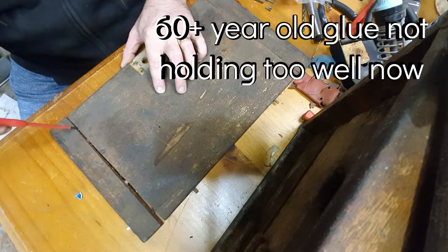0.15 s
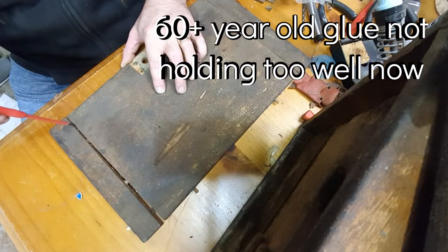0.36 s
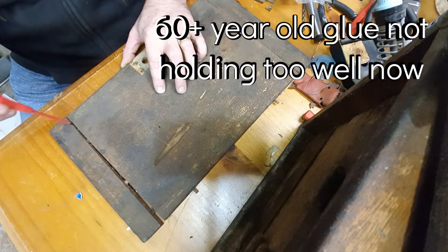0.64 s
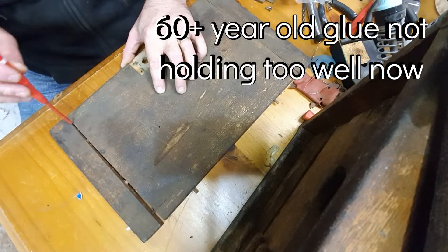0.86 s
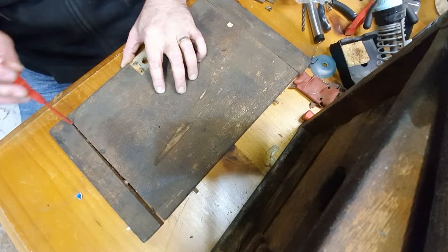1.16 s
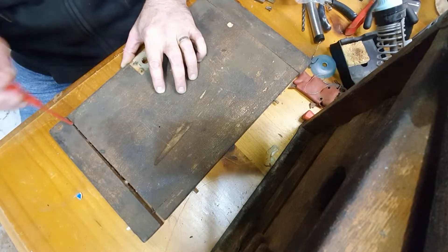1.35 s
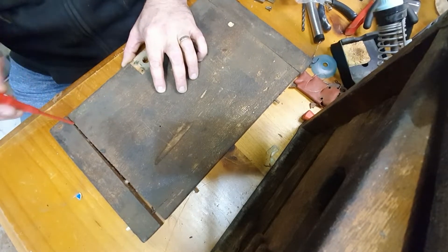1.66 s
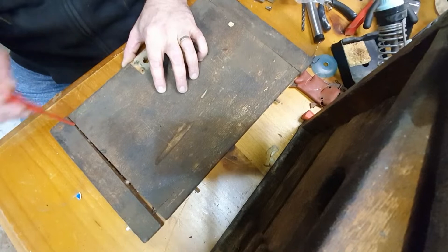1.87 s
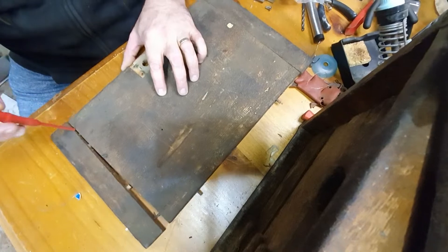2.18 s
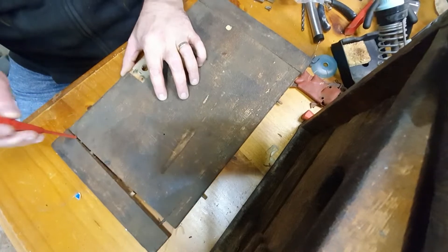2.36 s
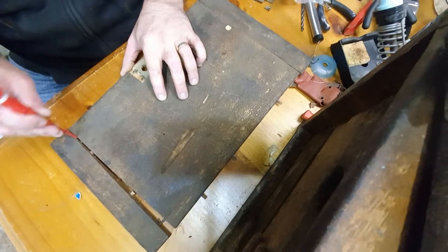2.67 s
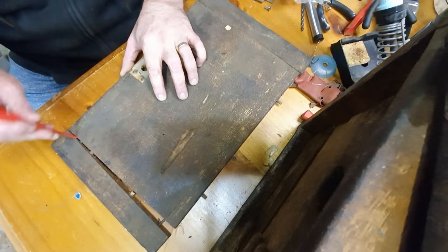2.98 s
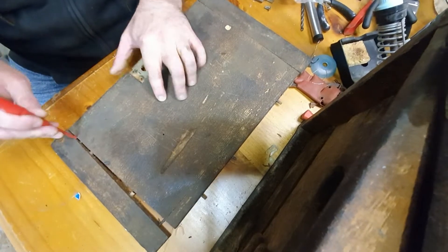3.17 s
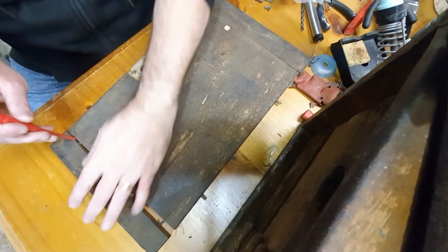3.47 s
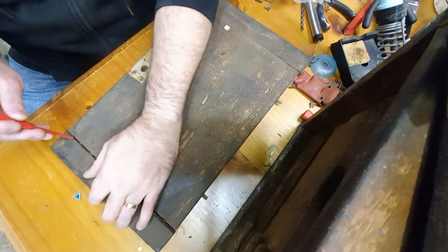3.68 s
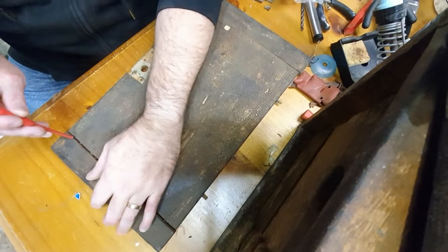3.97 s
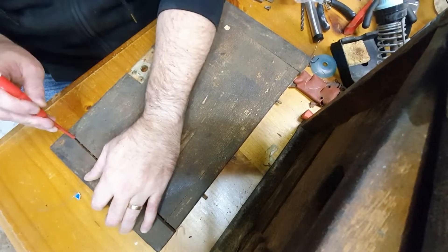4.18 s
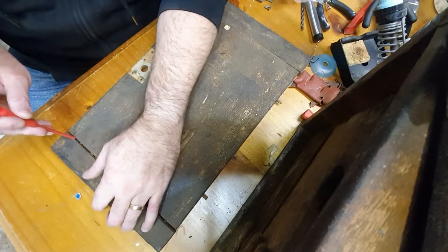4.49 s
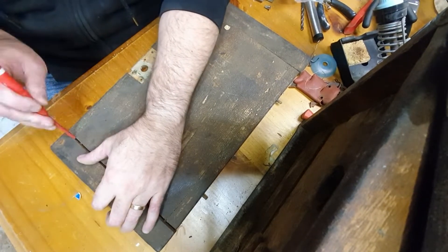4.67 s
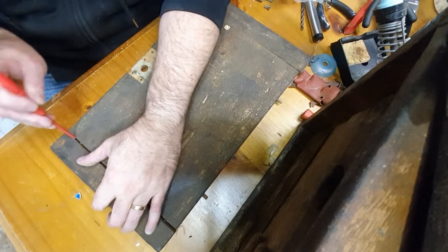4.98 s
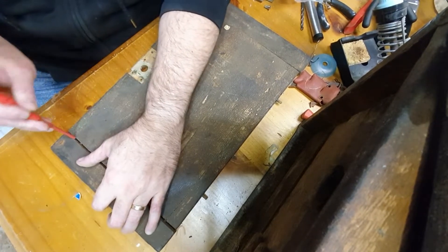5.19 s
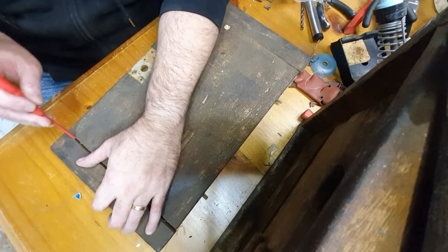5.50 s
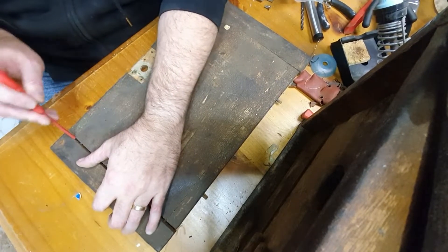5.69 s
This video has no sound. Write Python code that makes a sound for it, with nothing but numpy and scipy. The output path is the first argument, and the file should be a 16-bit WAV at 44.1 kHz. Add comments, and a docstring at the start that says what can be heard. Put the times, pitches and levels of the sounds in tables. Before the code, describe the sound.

Old glue cracks four times as a screwdriver pries at a wooden panel, amid light taps, ticks and scrapes.

```python
"""Dry glue cracks four times, loudly, as a screwdriver prises at the edge strip of an old wooden panel.
The panel lies on a workbench, close to a stereo microphone pair, and each crack sets it ringing.
The blade ticks and scrapes in the joint; after the cracks a hand moves over and the loose strip is
probed with light taps. A small workshop answers from behind, over a low rumble."""
import sys
import numpy as np
from scipy import signal
from scipy.fft import rfft, irfft
from scipy.io import wavfile
from scipy.ndimage import uniform_filter1d

SR = 44100
rng = np.random.default_rng(int(sys.argv[2]) if len(sys.argv) > 2 else 0)


def unload_wav(signal):
    """Save mono or channel-first audio to the path in sys.argv[1] as 16-bit WAV at rate SR, clipped to [-1, 1]."""
    wavfile.write(
        sys.argv[1],
        SR,
        np.round(np.clip(np.atleast_2d(signal).T, -1, 1) * 32767).astype(np.int16),
    )


N = 257544

# the workshop's room tone: (frequency [Hz], relative spectral level [dB])
ROOM_TONE = [(20, -32.5), (33, -16), (45, -8), (75, -0.5), (130, -6.5), (200, -22.5), (370, -17),
             (600, -23.5), (1000, -31), (1900, -35), (2400, -46.5), (3400, -44), (4300, -59.5),
             (5000, -50.5), (8000, -56.5), (16000, -61.5)]
# the workshop's echo: (frequency [Hz], relative band level [dB], t60 [s])
ROOM_ECHO = [(98.3, -8.5, 0.94), (291.8, -7.5, 0.15), (460, -5, 0.56), (731, -7, 0.42), (1500, -7.5, 0.54),
             (4000, -10, 0.43), (8260, -8.5, 0.32), (16000, -11, 0.27)]
# the image at the microphone pair: (frequency [Hz], side against mid [dB], left minus right [dB])
MIC_IMAGE = [(59.4, -14, 0.5), (149, -15, 1.5), (338, -10, 1.5), (650, -4.5, 1.5), (1050, 0, 2),
             (2400, 3, 4.5), (4200, -2, 3), (6760, 2.5, 5), (13900, -2, 3)]
# the panel's own modes: (frequency [Hz], level [dB], t60 [s])
PANEL_MODES = [(119.3, -4, 0.2), (150.3, -8.5, 0.24), (182.4, -3.5, 0.15), (214.4, -4.5, 0.11),
               (347.8, 1.5, 0.1), (498, -7.5, 0.22), (578, -5, 0.3), (679, -6, 0.33), (753.3, -9.5, 0.24),
               (932, -11.5, 0.24), (1035, -11.5, 0.22), (1231, -3, 0.097), (3348, -4, 0.03),
               (4178, -2.5, 0.022)]
# the dense, quickly damped ringing of the grain: (frequency [Hz], level [dB], t60 [s])
GRAIN_RING = [(98, -10.5, 0.12), (194, -3.5, 0.04), (330, 2, 0.042), (464, -2, 0.055), (810, 2, 0.058),
              (1330, -3.5, 0.043), (2100, -13.5, 0.11), (3490, -11.5, 0.033), (4440, -20, 0.041),
              (4700, -21.5, 0.042), (6580, -18.5, 0.02), (11070, -32.5, 0.039), (15650, -29.5, 0.015)]
# the loose strip's modes, hollow and short: (frequency [Hz], level [dB], t60 [s])
STRIP_MODES = [(369, 0.5, 0.046), (597, -5, 0.04), (761.5, -4, 0.046), (1067, -12, 0.037),
               (1490, -5.5, 0.026), (2340, -10, 0.0074)]
# the steel blade's modes: (frequency [Hz], level [dB], t60 [s])
BLADE_MODES = [(1586, -2.5, .04), (2577, -6, .025), (3325, 1, .025), (4280, 0.5, 0.015)]
# a harder contact reaches higher: (hardness [0-1], clack level [dB], snap level [dB]), both relative
CONTACT = [(0, -22.5, -38), (0.301, -8.5, -23.5), (0.552, -6.5, -22.5), (1, -3.5, -2)]
# the panel shifting under the hand: (time [s], level [dB])
SHIFT_LEVELS = [(0, -53.5), (.9, -48.5), (1.05, -58), (1.33, -54), (1.39, -40), (2.1, -45), (2.22, -48),
                (3.302, -47), (3.37, -45), (3.458, -54), (5.84, -51)]
# blade or hand sliding on the wood; skin hisses more than steel:
# (middle time [s], length [s], level [dB], relative hiss level [dB])
SCRAPES = [(0.494, 0.1, -58, -21), (0.74, 0.08, -52.5, -21), (1.172, 0.019, -49.5, -19),
           (1.452, 0.1, -54, -14), (1.775, 0.31, -57, -20), (1.925, 0.11, -52, -12),
           (2.336, 0.074, -44, -23), (2.488, 0.1, -67, -6.5), (3.207, 0.024, -51, -14),
           (3.268, 0.041, -50, -11.5), (3.375, 0.054, -51, -22), (3.631, 0.033, -48.5, -14),
           (3.72, 0.099, -50, -19.5), (4.096, 0.035, -53, -21.5), (4.641, 0.075, -57.5, -9)]
# the blade tip catching on splinters and glue: (time [s], level [dB], brightness [dB])
TICKS = [(0.297, -62.5, -7), (0.475, -54, -5), (0.521, -68, 9), (0.705, -62, 9.5), (.848, -57, -4),
         (1.174, -60, -1), (1.233, -54, -5), (1.493, -49, -16), (1.907, -39.5, -5.5), (1.968, -38, -30),
         (2.517, -60.5, -6.5), (2.669, -46.5, -15), (2.702, -55, -22), (2.905, -40.5, -17.5),
         (2.913, -52.5, -18), (3.059, -48, -31), (3.111, -51, -16), (3.203, -52.5, -10), (3.255, -66, -18),
         (3.371, -57, -25), (3.63, -49, -8), (4.446, -44, -15), (4.472, -51.5, -8.5), (4.685, -48, -13.5),
         (5.057, -46, -8.5), (5.068, -53, -16), (5.456, -49.5, -11), (5.668, -58.5, -24.5),
         (5.773, -45, -9.5)]
# blade and hand knocking: (time [s], level [dB], pitch [Hz], hardness [0-1], loose strip's share [0-1])
KNOCKS = [(0.183, -32.5, 380, 0.32, 0.59), (.345, -42.5, 243, 0.31, 0.67), (0.69, -42, 150, 0.18, 0.12),
          (1.136, -32.5, 264, 0, 0.5), (1.169, -34, 316, 0.52, 0.74), (1.359, -29, 265, 0.17, 0.25),
          (1.378, -33.5, 158, 0.45, 0.2), (1.462, -30, 215, 0.21, 0.25), (1.628, -31.5, 211, 0.13, 0.01),
          (1.769, -27, 195, 0.18, 0.04), (1.792, -26, 205, 0.15, 0.05), (1.945, -29, 206.4, 0, 0.27),
          (1.974, -34.5, 241.5, 0.8, .1), (1.982, -28.5, 210, .75, 0.1), (2.67, -41.5, 130, 0.3, 0),
          (2.776, -27.5, 191, 0.76, 0.2), (2.906, -35, 168, 0.2, 0), (3.057, -39, 205, 0.68, 0.09),
          (3.169, -41, 208, 0.06, 0.03), (3.332, -34.5, 134, 0.16, 0.02), (3.36, -41.5, 136, 0.6, 0),
          (3.394, -39, 140, 0, 0), (3.629, -38.5, 199, 0.87, 0.44), (3.713, -34.5, 270, 0.68, 0.76),
          (3.72, -36, 298, 0.87, 0.6), (3.733, -35.5, 210, 0.13, 0.2), (4.105, -39.5, 180, 0.68, 0.18),
          (4.436, -42.5, 219, 0.3, 0.2), (4.443, -32, 260, 0.84, 0.99), (4.677, -39, 186, 0.19, 0.04),
          (4.887, -39, 190, 0.11, 0.37), (5.069, -36, 207, 0.23, 0.2), (5.27, -39.5, 181, 0.2, 0.43),
          (5.45, -35, 193, 0.43, 0.4), (5.613, -41, 218, 0, 0.3), (5.767, -39.5, 166, 0.37, 0.16)]
# the glue letting go:
# (time [s], level [dB], pitch [Hz], hardness [0-1], second split's delay [s], its relative level [dB])
CRACKS = [(1.548, -23, 300, 0.62, 0.011, -3), (1.709, -21.5, 323, 0.67, 0.0084, -1.5),
          (1.874, -16.5, 288, 0.8, .0105, -4), (2.0475, -19.5, 280, 0.83, 0.015, -2.5)]

RING_S, TICK_S = .3, .06  # how long a blow and a tick are left to ring


def undb(db):
    """Decibels to gain."""
    return 10 ** (np.asarray(db) / 20)


def at(hz, table, axis=1):
    """A column of a table, read on a log-frequency axis."""
    table = np.array(table, float)
    return np.interp(np.log(np.maximum(hz, 1)), np.log(table[:, 0]), table[:, axis])


def band(x, lo_hz, hi_hz, order=3):
    """Causal band-pass."""
    sos = signal.butter(order, [lo_hz, min(hi_hz, SR / 2 - 100)], "band", fs=SR, output="sos")
    return signal.sosfilt(sos, x)


def resonance(x, hz, width_hz):
    """One resonance, gain 1 at its centre."""
    return signal.lfilter(*signal.iirpeak(hz, hz / width_hz, fs=SR), x)


def unit(x):
    """Scale to rms 1."""
    return x / np.sqrt(np.mean(x ** 2))


def burst(x, db):
    """Scale a hit so that its energy equals db held for 20 ms."""
    return x * undb(db) * np.sqrt(2 * .02 * SR / np.sum(x ** 2))


def onset(x, rise_s):
    """Let a hit build up over rise_s."""
    return x * (1 - np.exp(-(np.arange(x.shape[1]) / (rise_s * SR)) ** 2))


def add(out, s, x):
    """Mix x in from time s."""
    i = max(int(s * SR), 0)
    out[:, i:i + x.shape[1]] += x[:, :max(N - i, 0)]


def leftward(x, db):
    """Place a sound toward the left microphone."""
    return x * undb(np.array([[db], [-db]]) / 2)


def mic_pair(x):
    """Two unrelated signals at the microphones: alike in the bass, wide and leftward in the treble."""
    size = x.shape[1]
    hz = np.fft.rfftfreq(size, 1 / SR)
    mid, side = rfft(x)
    share, sign = undb(at(hz, MIC_IMAGE)), np.array([[1], [-1]])
    spread = (mid + sign * share * side) / np.hypot(1, share)
    return irfft(spread * undb(sign * at(hz, MIC_IMAGE, axis=2) / 2), size)


def stereo_noise(size):
    """White noise as the microphone pair hears it."""
    return mic_pair(rng.standard_normal((2, size)))


def tail(table, length_s, even=False):
    """Countless close modes: noise bands dying at their own rates; even gives each fade equal energy."""
    t = np.arange(int(length_s * SR)) / SR
    hz = np.fft.rfftfreq(len(t), 1 / SR)
    spectrum = rfft(stereo_noise(len(t))) * undb(at(hz, table))
    centres = np.geomspace(60, 16000, 17)  # half an octave apart
    out = 0
    for centre, pick in zip(centres, np.eye(len(centres))):
        noise = irfft(spectrum * np.interp(hz, centres, pick), len(t))
        fade = np.exp(-np.log(1000) * t / at(centre, table, axis=2))
        out = out + noise * fade / (np.linalg.norm(fade) if even else 1)
    return out


def ring_modes(table, scatter_db, detune, length_s):
    """Decaying modes, reweighted and detuned at random as the struck spot and hand pressure vary."""
    t = np.arange(int(length_s * SR)) / SR
    hz, db, t60 = np.array(table, float).T[:, :, None]
    weight, shift, polarity, lag = rng.standard_normal((len(table), 4)).T[:, :, None]
    swing = np.sign(polarity) * undb(db + scatter_db * weight) * np.exp(-np.log(1000) * t / t60)
    phase = 2 * np.pi * hz * (1 + detune * shift) * t
    # short waves reach the two microphones out of step
    apart = lag * undb(at(hz, MIC_IMAGE)) * 0.5
    lean_db = at(hz, MIC_IMAGE, axis=2) / 2
    mics = [swing * undb(side * lean_db) * np.sin(phase + side * apart) for side in (1, -1)]
    return np.sum(mics, axis=1)


def room_tone(level_db=-49.5):
    """Steady rumble and faint hiss of the workshop."""
    spectrum = rfft(stereo_noise(N)) * undb(at(np.fft.rfftfreq(N, 1 / SR), ROOM_TONE))
    return unit(irfft(spectrum, N)) * undb(level_db)


def room_echo(direct):
    """Sound leaves the panel to either side, and each side finds its own way round the room."""
    return sum(signal.oaconvolve(side[None], tail(ROOM_ECHO, 1.0, even=True), axes=1)[:, :N]
               for side in direct)


def shifting(trim_db=-1):
    """The panel rocks and rubs on the bench under the hand: a dull, uneven mutter."""
    s, db = np.transpose(SHIFT_LEVELS)
    mutter = unit(band(stereo_noise(N), 69, 215, order=2))
    return mutter * undb(np.interp(np.arange(N) / SR, s, db) + trim_db)


def panel_ring(modes_db):
    """The struck panel: its own modes over the dense ringing of the grain."""
    modes = ring_modes(PANEL_MODES, scatter_db=2, detune=.022, length_s=RING_S)
    return undb(modes_db) * modes + tail(GRAIN_RING, RING_S)


def sing(x, db):
    """Steel on this wood makes it sing in one treble band."""
    return x + undb(db) * resonance(x, hz=4330, width_hz=330)


def scrapes(slips_per_s=170, spread_db=7, rasp_db=-2, spots=4, rest_from_s=3.9, rest_db=-67.5):
    """Dense, uneven stick-slips ring the wood at several spots; its rough face hisses above them."""
    t = np.arange(N) / SR
    slipping = rng.random((spots, N)) < slips_per_s / SR
    slips = slipping * undb(spread_db * np.minimum(rng.standard_normal((spots, N)), 1))
    wood = sum(signal.oaconvolve(spot[None], onset(panel_ring(modes_db=-44.5), .0048), axes=1)[:, :N]
               for spot in slips)
    rub = unit(band(wood, 600, 8000, order=1))
    slip_power = uniform_filter1d(np.sum(slips ** 2, axis=0), 60)
    grit = np.sqrt(np.abs(slip_power) + .003)
    hiss = unit(band(stereo_noise(N) * grit, 4100, 12000, order=2))
    out = 0
    for s, length_s, db, hiss_db in SCRAPES:
        # the harder the blade presses, the more the wood sings
        rasp = unit(sing(rub, np.interp(db, [-55, -47], [3, 14])))
        stroke = np.exp(-2 * ((t - s) / length_s) ** 2)
        out = out + stroke * (rasp * undb(db + rasp_db) + hiss * undb(db + hiss_db))
    # once the hand lies across the strip it keeps rubbing faintly
    resting = rub * undb(rest_db) * (t > rest_from_s)
    return leftward(out + resting, db=4)


def tick(db, bright_db, slip_s=.0005):
    """One slip of the steel tip: the blade rings over a short woody click and a dry, bright scratch."""
    steel = ring_modes(BLADE_MODES, scatter_db=4, detune=.035, length_s=TICK_S)
    t = np.arange(steel.shape[1]) / SR
    click = band(tail(GRAIN_RING, TICK_S), 2000, 7400, order=2)
    body = onset(burst(steel, db - 9) + burst(click, db - 5), rise_s=.00088)
    scratch = leftward(stereo_noise(len(t)) * t * np.exp(-t / slip_s), db=10)
    scratch = band(scratch, 3800, 21000, order=2)
    return leftward(body, db=5) + burst(scratch, db + bright_db - 1)


def ticks(crumb_db=-15, mean_gap_s=.005, crumbs=3):
    """The steel tip slips off a splinter, and a few crumbs of glue follow."""
    out = np.zeros((2, N))
    for s, db, bright_db in TICKS:
        add(out, s, tick(db, bright_db))
        delays = np.cumsum(rng.exponential(mean_gap_s, crumbs))
        for delay, size in zip(delays, rng.standard_normal(crumbs)):
            add(out, s + delay, tick(db + crumb_db, bright_db) * size)
    return out


def strip_ring(hardness, soft_hz=560, opens_hz=5500):
    """The loose strip's hollow note; a harder contact reaches its higher modes."""
    ring = ring_modes(STRIP_MODES, scatter_db=1.2, detune=.012, length_s=RING_S)
    return band(ring, 150, soft_hz + opens_hz * hardness ** 2, order=2)


def blow(db, hz, hardness, strip_share, thump_db=1.5):
    """Soft pushes mostly thump; hard contacts and breaking glue also clack and snap."""
    grades, clacks, snaps = np.transpose(CONTACT)
    clack_db = db + np.interp(hardness, grades, clacks)
    snap_db = db + np.interp(hardness, grades, snaps)
    # force 0: a light tap settles in, drier, at the left edge; 1: glue breaks at once and rings the panel
    force = np.interp(snap_db, [-48, -30], [0, 1])
    modes_db = np.interp(force, [0, 1], [-28, -22])
    rise_s = np.interp(force, [0, 1], [.0016, .000043])
    snap_top_hz = np.interp(force, [0, 1], [13000, 5100])
    left_db = np.interp(force, [0, 1], [5.5, -3])
    ring = onset(panel_ring(modes_db), rise_s)
    strip = burst(onset(strip_ring(hardness), rise_s), db - 1.5)
    # the speed of the push picks which low modes answer
    low_ring = burst(band(ring, hz / 2.29, hz * 1.242, order=2), db)
    # part of a break's thump is one dry shove that does not ring on
    impulse = np.ones((2, 1)) * signal.unit_impulse(ring.shape[1])
    shove = burst(band(impulse, hz / 2, hz * 2, order=2), db)
    shove_share = .45 * force
    thump = np.sqrt(shove_share) * shove + np.sqrt(1 - shove_share) * low_ring
    # a padded contact with little snap also has a duller clack
    clack_top_hz = np.interp(snap_db - clack_db, [-20, -8], [1200, 2300])
    clack = band(ring, 561, clack_top_hz)
    snap = leftward(sing(band(ring, 3100, snap_top_hz, order=2), db=-2), left_db)
    panel = thump * undb(thump_db) + burst(clack, clack_db + .5) + burst(snap, snap_db + 1)
    return np.sqrt(1 - strip_share) * panel + np.sqrt(strip_share) * strip


def knocks():
    """Single blows of blade and hand on the panel and its loose strip."""
    out = np.zeros((2, N))
    for s, db, hz, hardness, strip_share in KNOCKS:
        add(out, s, blow(db, hz, hardness, strip_share))
    return out


def fibres(db, hardness, mean_delay_s=.003, spread_db=5, count=14):
    """Wood fibres tear one after another: a quick, thinning rattle of tiny clicks under the snap."""
    clicks = np.zeros((2, int(RING_S * SR)))
    when = np.minimum(rng.exponential(mean_delay_s, count) * SR, clicks.shape[1] - 1).astype(int)
    clicks[:, when] = rng.choice([-1, 1], count) * undb(spread_db * rng.standard_normal((2, count)))
    grades, _, snaps = np.transpose(CONTACT)
    snap_db = db + np.interp(hardness, grades, snaps)
    return burst(band(clicks, 2600, 6200, order=4), snap_db - 8)


def cracks(strip_share=.14):
    """The glue joint breaks with a thump and tearing fibres, then splits further with less weight."""
    out = np.zeros((2, N))
    for s, db, hz, hardness, split_s, split_db in CRACKS:
        add(out, s, blow(db, hz, hardness, strip_share) + fibres(db, hardness))
        split = blow(db + split_db, hz, hardness, strip_share, thump_db=-4.5)
        add(out, s + split_s, split + fibres(db + split_db, hardness))
    return out


def scene():
    """The work on the panel up close, its echo from bench and walls 8 ms later, and room tone behind."""
    out = cracks() + knocks() + ticks() + scrapes()
    add(out, .008, room_echo(out) * undb(-3))
    return out + shifting() + room_tone()


def record(dry):
    """The microphones have a presence peak; the recorder cuts the top."""
    presence_db, top_hz = 5.5, 16000
    presence = (undb(presence_db) - 1) * resonance(dry, hz=4300, width_hz=700)
    return signal.sosfilt(signal.ellip(8, .2, 70, top_hz, fs=SR, output="sos"), dry + presence)


dry = scene()
out = record(dry)
unload_wav(out)
```